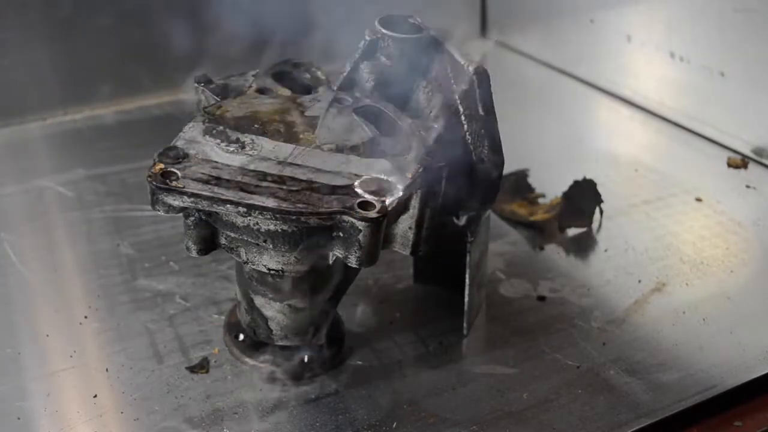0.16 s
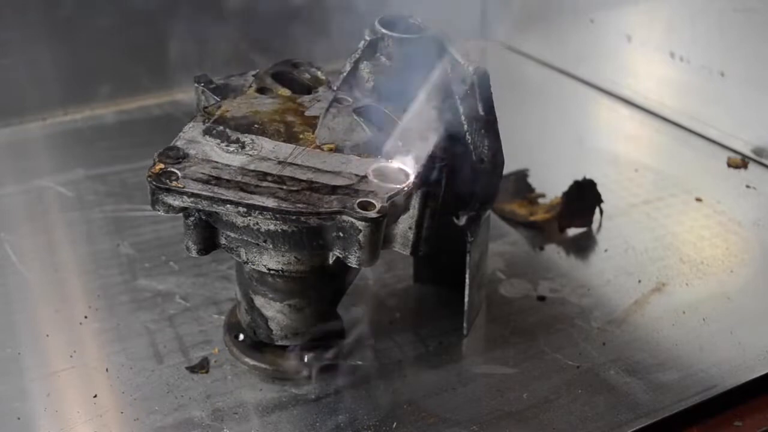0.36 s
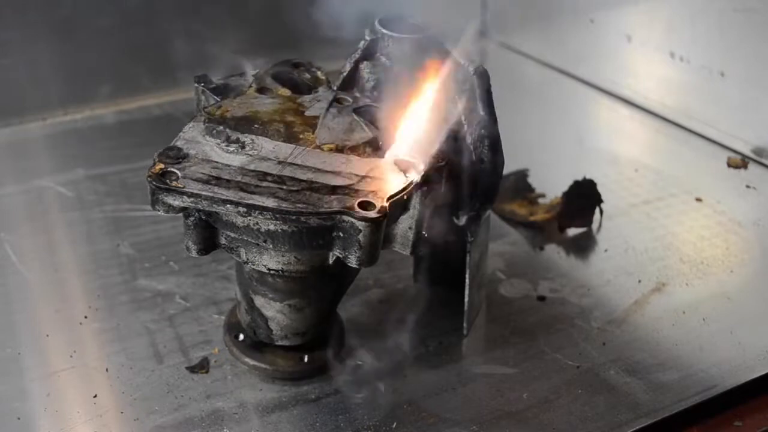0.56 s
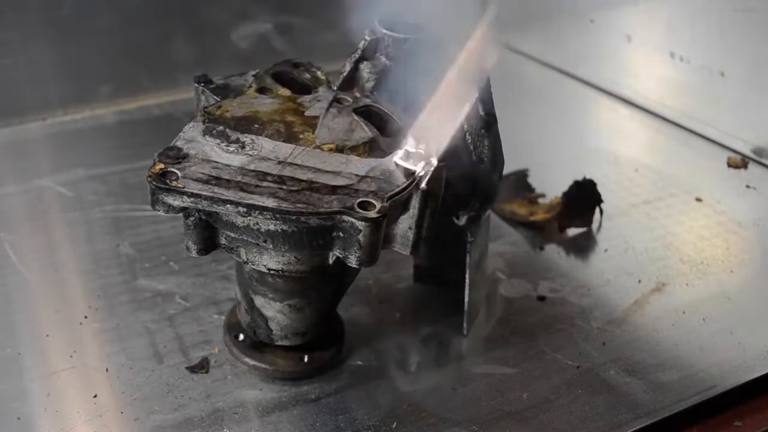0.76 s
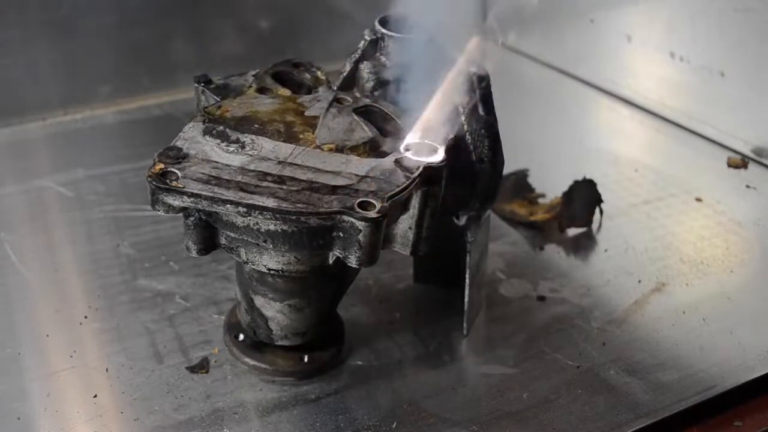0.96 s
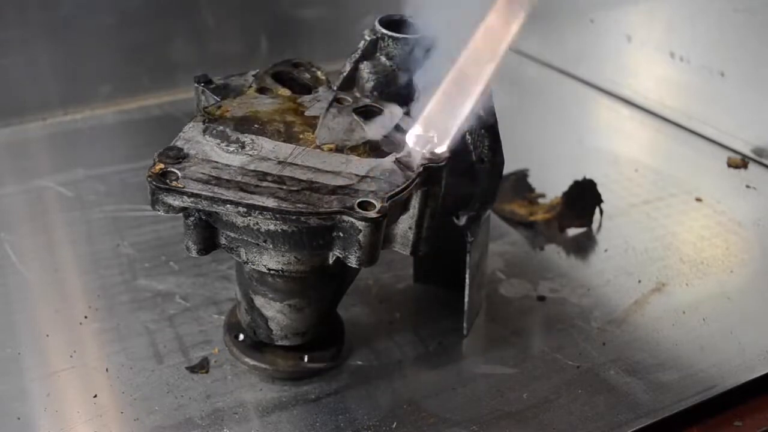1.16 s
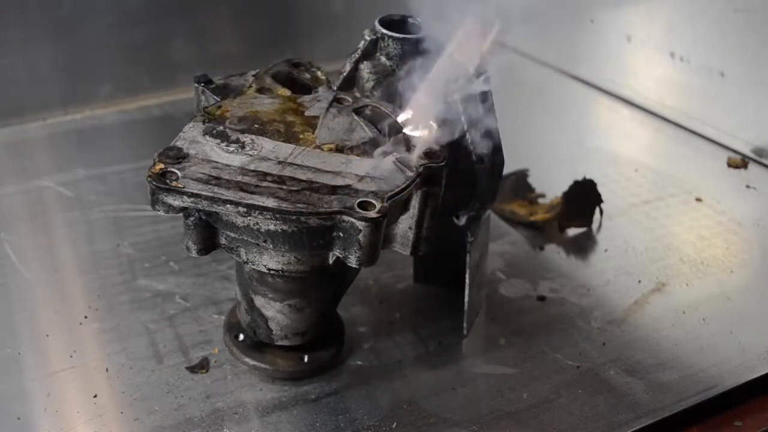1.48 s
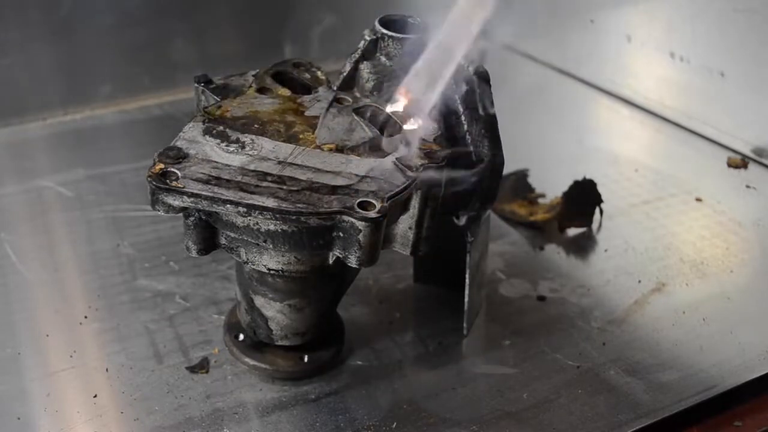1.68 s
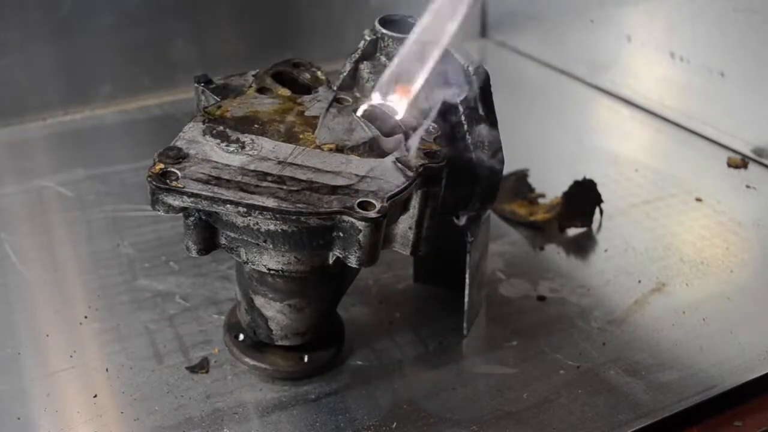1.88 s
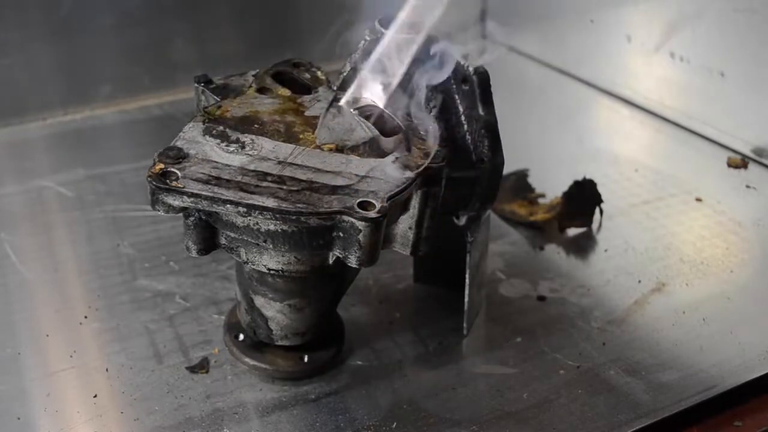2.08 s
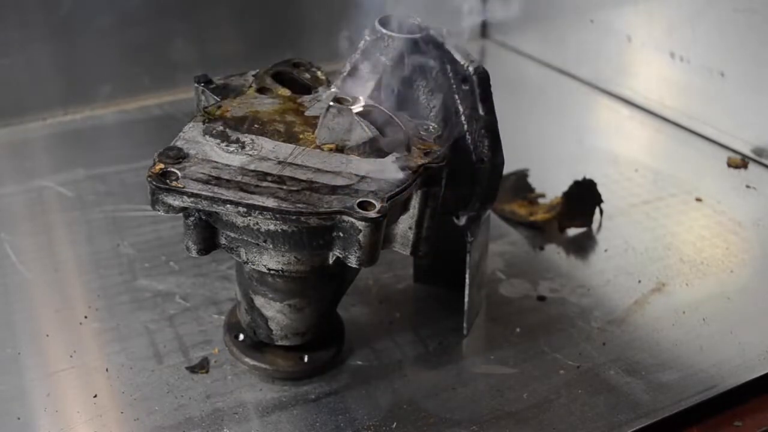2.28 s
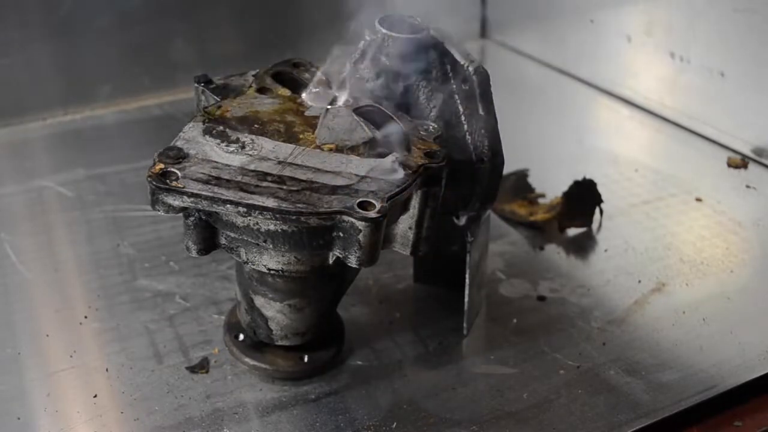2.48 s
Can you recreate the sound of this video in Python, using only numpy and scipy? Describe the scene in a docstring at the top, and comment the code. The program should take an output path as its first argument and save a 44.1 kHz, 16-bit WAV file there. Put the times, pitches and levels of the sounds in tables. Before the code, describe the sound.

A laser cleaning a grimy metal casting makes a thin, very high whine with treble fizz, quiet at first. Around 0.4-0.75 s it swells into a harsh low buzz with a few sharp snaps. It thins to whine and light buzzing, turns raspier from 1.6 s, then buzzes and crackles rapidly at 1.9-2.25 s. Tiny pings and a brief falling squeal follow as it fades, close and dry.

```python
"""In a steel cabinet, a pulsed laser cleans a greasy metal casting; its spot races round a small ring led slowly over the part.
The shot rate is a thin whine, a sine with side tones; laps over thick grime buzz and sharp stain edges rasp.
Edges chop the shot tone into treble fizz; uneven dirt yield adds noise, a grainy hiss and soft roar.
Flakes snap off, chips ping as decaying sines, and a side band sweeps down late on.
Short wall reflections surround the work; filtered-noise air and a mains hum lie faintly behind."""
import sys
import numpy as np
from scipy import signal
from scipy.fft import rfft, irfft, next_fast_len
from scipy.io import wavfile
from scipy.ndimage import uniform_filter1d, map_coordinates

SR = 44100
rng = np.random.default_rng(int(sys.argv[2]) if len(sys.argv) > 2 else 0)


def materialize(psi):
    """Save the field psi as 16-bit PCM at rate SR to the path in sys.argv[1].

    A 1-D psi becomes a single channel; in a 2-D psi each row is a channel.
    """
    bounded = np.clip(np.atleast_2d(psi).T, -1, 1)
    quanta = np.round(bounded * 32767).astype(np.int16)
    wavfile.write(sys.argv[1], SR, quanta)


N = 116865
T = np.arange(N) / SR   # s

# position of the thickest grime on the ring: t/s, angle/turns
GRIME_POSITION = [(0, 0.3), (.33, 0.44), (.5, 0.59), (1.0, 0.7), (1.55, 1), (2.2, 0.79), (2.65, 1)]

# register levels before trim and flutter: t/s, level/dB
HUM_LEVEL = [(0.0, -62.5), (0.06, -74), (0.15, -59.5), (0.19, -74), (0.34, -65), (0.43, -42.5),
             (0.52, -41.5), (0.6, -47), (0.64, -41.5), (0.8, -70), (0.83, -56), (0.94, -71.5), (1.01, -58),
             (1.12, -65.5), (1.17, -58), (1.34, -56.5), (1.41, -60.5), (1.83, -58.5), (1.96, -44.5),
             (2.21, -47), (2.36, -69), (2.65, -79)]   # deep hum at the lap rate
BUZZ_LEVEL = [(0, -64), (.08, -77.5), (.14, -58), (.19, -72), (.33, -64.5), (.43, -37.5), (.52, -37),
              (.6, -46), (.64, -36), (.72, -44.5), (.78, -64), (.96, -53), (1.15, -52.5), (1.22, -59.5),
              (1.41, -67), (1.445, -51), (1.48, -67.5), (1.65, -44.5), (1.89, -59.5), (1.97, -46.5),
              (2.19, -44), (2.21, -59), (2.31, -52.5), (2.35, -64.5), (2.65, -77)]   # low buzz
NASAL_LEVEL = [(0, -66), (.06, -76), (.14, -54.5), (.2, -69.5), (.45, -46.5), (.6, -50.5), (.69, -41.5),
               (.79, -60.5), (.97, -48.5), (1.52, -62), (1.73, -48.5), (1.81, -58), (1.93, -48.5),
               (1.99, -61.5), (2.19, -43), (2.24, -62.5), (2.65, -73.5)]   # nasal middle of the buzz
RASP_LEVEL = [(0, -57), (.06, -62.5), (.14, -51.5), (.18, -62), (.34, -64), (.46, -46.5), (.51, -41.5),
              (.56, -67.5), (.69, -45.5), (.9, -61.5), (.98, -57), (1.22, -65), (1.29, -48.5), (1.41, -61),
              (1.56, -50), (1.84, -52), (1.9, -41), (2.08, -57), (2.18, -49.5), (2.65, -67.5)]   # rasp
BITE_LEVEL = [(0, -56.5), (.07, -68), (.15, -52), (.2, -67), (.34, -65.5), (.48, -50), (.56, -65),
              (.72, -58), (.93, -64), (1.48, -62.5), (1.64, -44.5), (2.04, -57.5), (2.29, -52), (2.35, -64),
              (2.52, -56.5), (2.65, -80)]   # bright top of the rasp
FIZZ_LEVEL = [(0.0, -50.5), (0.05, -61), (0.14, -44.5), (0.21, -59), (0.26, -55), (0.28, -58), (0.43, -48),
              (0.55, -52), (0.67, -44.5), (0.69, -44), (0.92, -55), (1.0, -49), (1.34, -50), (1.39, -57.5),
              (1.64, -46), (1.84, -50), (1.89, -49.5), (1.97, -54), (2.01, -50), (2.07, -48), (2.14, -50),
              (2.22, -44.5), (2.35, -56), (2.42, -51), (2.55, -57.5), (2.65, -61)]   # treble around the whine
# level of the whine before trim: t/s, level/dB
WHINE_LEVEL = [(0, -46.5), (.22, -50.5), (.35, -44.5), (.43, -31), (.6, -33.5), (.64, -30), (.8, -40.5),
               (.91, -44), (.99, -37), (1.42, -41.5), (1.51, -46), (1.62, -37.5), (1.84, -38),
               (1.97, -33.5), (2.19, -34), (2.44, -50.5), (2.51, -47.5), (2.65, -62.5)]

# spectral shape of each layer, relative: f/Hz, gain/dB
HUM_COLOUR = [(90, -28), (205, 0), (290, -9), (410, -40)]
BUZZ_COLOUR = [(205, -40), (330, -5), (410, 0), (616, -5), (822, -35), (1500, -60)]
NASAL_COLOUR = [(480, -60), (800, 0), (1050, 0), (1450, -60)]
RASP_COLOUR = [(900, -55), (1200, 2), (1440, 0), (1645, -1.5), (1850, -1.5), (2200, -55)]
BITE_COLOUR = [(1700, -50), (2055, 7), (2400, 3), (2850, 0.5), (3300, -45), (5000, -41)]
EDGE_COLOUR = [(2200, -41), (3050, 3), (3450, 1.5), (4300, -5), (5500, -8), (7000, -18.5), (9000, -54)]
FIZZ_COLOUR = [(4000, -32), (5500, -18), (6800, -12), (7600, -5), (8600, -1), (9150, 0), (9600, -12),
               (10500, -12), (11050, 3), (12000, -1), (13200, -6), (14500, -12), (16000, -15)]
SIZZLE_COLOUR = [(40, -17), (300, -5.5), (1200, 0.5), (2500, -4), (4500, -12.5), (6800, -12), (9000, -10.5),
                 (10300, 2.5), (12000, -9), (15500, -34)]
ROAR_COLOUR = [(30, -32), (150, -9), (400, -2), (1100, 0), (2500, -6), (4500, -17), (9000, -25)]
AIR_COLOUR = [(25, -76), (100, -8), (300, 7), (600, -17), (1050, 18.5), (2500, 8.5), (5000, -2.5),
              (10000, 2), (16000, -20)]

# whine band, and a gap where two patches of grime cancel: t/s, centre/Hz, half width/Hz, gap/Hz
WHINE_BAND = [(0, 9520, 810, 9350), (.3, 10020, 470, 10460), (.55, 9940, 490, 10200),
              (.72, 10230, 490, 10300), (.87, 9840, 463, 9670), (1.12, 10210, 404, 9840),
              (1.3, 10000, 646, 9400), (1.52, 10200, 750, 9750), (1.65, 9960, 687, 10060),
              (1.82, 10050, 650, 10000), (1.94, 9920, 450, 8750), (2.04, 10080, 476, 10200),
              (2.15, 10130, 635, 9660), (2.3, 9800, 550, 9900), (2.65, 10140, 600, 10150)]
# overtones of the buzz that swell and fade: middle t/s, half length/s, multiple of the lap rate
OVERTONE_SWELLS = [(0.782, 0.16, 7), (1.014, .2, 2), (1.096, 0.14, 5), (1.27, 0.11, 9), (1.612, 0.22, 9),
                   (1.707, 0.065, 4), (1.91, 0.022, 7), (2.275, 0.032, 14)]
# flakes cracking off, level before trim: t/s, level/dB
FLAKE_EVENTS = [(.3245, -37), (.3661, -33), (.4155, -28), (.528, -36), (.576, -39), (.592, -36),
                (1.906, -34), (1.9553, -32), (1.9695, -32), (2.0187, -33), (2.0672, -30), (2.0825, -30),
                (2.1307, -27), (2.1795, -26), (2.243, -37)]
# small chips pinging off the metal, initial amplitude: t/s, level/dB
PING_EVENTS = [(2.242, -39.5), (2.2908, -41), (2.3545, -48)]
# side band falling as the spot slides off an edge: t/s, f/Hz, level/dB
SIDE_BAND_SWEEP = [(2.25, 9350, -70), (2.28, 8800, -44), (2.305, 8050, -47.5), (2.33, 7060, -69)]

SHOT_HZ, LAP_HZ = 9998.2, 205.5
RING_RADIUS_MM, TRAVEL_MM_PER_S = 8, 22
STAIN_SCALE_MM, EDGE_SHARPNESS = 17, 7.5
GRIME_WIDTH_TURNS, FAR_SIDE_WIDTH_TURNS = 0.045, 0.035
FAR_SIDE_SHARE, BARE_SHARE, STAIN_SHARE = 0.59, 0.01, 0.23   # re grime yield
DOPPLER_RAD, DOPPLER_WANDER_RAD = 1.387, 0.1
MIC_TURNS = 0.89   # microphone direction on the ring
ECHO_S, ECHO_WANDER_S, ECHO_GAIN = 0.0007, 0.000061, 0.083   # first reflection off the part

# level trims
HUM_DB, BUZZ_DB, NASAL_DB, RASP_DB, BITE_DB, EDGE_DB = -1.5, 0, -.4, 0, -.6, -14.5
WHINE_DB, FIZZ_DB, SIZZLE_DB, ROAR_DB, FLAKE_DB = -1, 1.5, -10, -15, 1.5
AIR_DB, CABINET_DB = -67.5, -14
SWELL_DB = 8
GAP_WIDTH_HZ, GAP_DB = 110, -11
FLAKE_DECAY_S, FLAKE_HIGHPASS_HZ = .0008, 1600
PING_HZ, PING_DECAY_S = 4600, 0.00098
CABINET_T60_S = .075
MAINS_HZ, MAINS_DB = 100, -85
CUTOFF_HZ = 15850


def from_db(db):
    """Decibels to gain."""
    return 10 ** (np.asarray(db) / 20)


def in_time(rows):
    """Interpolate a two-column curve at every sample."""
    return np.interp(T, *np.transpose(rows))


def even(x):
    """Hold the rms over four laps near 1."""
    power = uniform_filter1d(x * x, size=int(4 * SR / LAP_HZ))
    return x / np.sqrt(power + 1e-14)


def colour(x, points):
    """Filter by a gain curve, linear in dB over log frequency."""
    hz, db = np.transpose(points)
    size = next_fast_len(N + 4096)
    f_hz = np.maximum(np.arange(size // 2 + 1) * SR / size, 1)
    gain = from_db(np.interp(np.log(f_hz), np.log(hz), db))
    return irfft(rfft(x, size) * gain, size)[:N]


def drift(rate_hz):
    """Smooth random curve of spread about 1, changing about rate_hz times a second."""
    return map_coordinates(rng.standard_normal(2048), [T * rate_hz + 2], order=2, mode="wrap")


def lobe(turns, width_turns):
    """A bell-shaped bump once a lap."""
    offset = (turns + .5) % 1 - .5
    return np.exp(-.5 * (offset / width_turns) ** 2)


def stains(count=14):
    """Dirt (0-1) under the circling spot: random plane waves clipped into sharp-edged stains."""
    spot_mm = RING_RADIUS_MM * np.exp(2j * np.pi * LAP_HZ * T) + TRAVEL_MM_PER_S * T
    field = np.zeros(N)
    for way, fine, start in rng.random((count, 3)):
        along_mm = (spot_mm * np.exp(2j * np.pi * way)).real
        field += np.cos(2 * np.pi * (along_mm * (.5 + fine) / STAIN_SCALE_MM + start))
    return .5 + .5 * np.tanh(EDGE_SHARPNESS * field / np.sqrt(count / 2))


def partials(x, pitches_hz, evenness, size=1290):
    """Split a once-a-lap sound into lines and pull their strengths towards one another."""
    window = np.hanning(size)
    for hz in pitches_hz:
        kernel = window * np.exp(2j * np.pi * hz * T[:size])
        centring = np.exp(-1j * np.pi * hz * (size - 1) / SR)
        line = signal.oaconvolve(x, kernel, "same") * centring
        yield line.real / (np.abs(line) + 1e-9) ** np.clip(evenness, 0, 1)


def swell(k):
    """Gain of the k-th overtone, raised by its flat-topped swells."""
    return from_db(sum(SWELL_DB * np.exp(-((T - s) / half_s) ** 4)
                       for s, half_s, multiple in OVERTONE_SWELLS if multiple == k))


def overtones(flow, multiples, evenness):
    """Clean lines at multiples of the lap rate, each with its swells."""
    lines = partials(flow, LAP_HZ * multiples, evenness, size=2150)
    return sum(swell(k) * line for k, line in zip(multiples, lines))


def voiced(flow, level_db, points, rough, flutter_db=2.5):
    """One register of the vapour flow: coloured, rough in strength and fluttering in level."""
    rough_flow = flow * (1 + rough * drift(500))
    level = from_db(level_db + flutter_db * drift(39.73))
    return level * even(colour(rough_flow, points))


def buzz(passes, edges, low_edge_share=0.55, high_edge_share=1.0, count=36):
    """Lap puffs off the grime give the low registers; flow jumps at stain edges the rasp and its top."""
    multiples = np.arange(1, count)
    puffs = overtones(passes + low_edge_share * edges, multiples[:5], evenness=.9)
    jumps = overtones(passes + high_edge_share * edges, multiples[5:], evenness=.45)
    return (voiced(puffs, HUM_DB + in_time(HUM_LEVEL), HUM_COLOUR, rough=0.13)
            + voiced(puffs, BUZZ_DB + in_time(BUZZ_LEVEL), BUZZ_COLOUR, rough=0.056)
            + voiced(puffs, NASAL_DB + in_time(NASAL_LEVEL), NASAL_COLOUR, rough=0.11)
            + voiced(jumps, RASP_DB + in_time(RASP_LEVEL), RASP_COLOUR, rough=0.07)
            + voiced(jumps, BITE_DB + in_time(BITE_LEVEL), BITE_COLOUR, rough=0.092)
            + voiced(jumps, EDGE_DB + in_time(FIZZ_LEVEL), EDGE_COLOUR, rough=0.083))


def band(hz, centre_hz, width_hz):
    """Gain of a resonance with steep skirts."""
    return 1 / (1 + ((hz - centre_hz) / width_hz) ** 4)


def whine(shots, burn, rough=0.071, count=6):
    """The shot rate with side tones a lap rate apart, in a band that shifts and widens with the grime."""
    at_s, *curves = np.transpose(WHINE_BAND)
    centre_hz, width_hz, gap_hz = (np.interp(T, at_s, curve) for curve in curves)
    pitches_hz = SHOT_HZ + LAP_HZ * np.arange(-count, count + 1)
    tone = np.zeros(N)
    for hz, line in zip(pitches_hz, partials(shots * burn, pitches_hz, evenness=0.84)):
        gap = from_db(GAP_DB * np.exp(-((hz - gap_hz) / GAP_WIDTH_HZ) ** 2))
        tone += line * band(hz, centre_hz, width_hz) * gap
    return from_db(WHINE_DB + in_time(WHINE_LEVEL)) * even(tone * (1 + rough * drift(500)))


def glance(x):
    """Add a reflection off the part; its changing path makes the emphasis wander."""
    delay_s = ECHO_S + ECHO_WANDER_S * drift(11)
    return x + ECHO_GAIN * np.interp(T - delay_s, T, x)


def fizz(shots, passes, edges, grime_share=0.43, rough=0.11):
    """Stain edges and grime passes chop the shot tone into a wide comb of side tones."""
    chopped = shots * glance(edges + grime_share * passes)
    return voiced(chopped, FIZZ_DB + in_time(FIZZ_LEVEL), FIZZ_COLOUR, rough)


def sizzle(burn, grain_db=-0.5, hum_share=0.033):
    """Uneven yield from shot to shot as noise: a grainy hiss, and a soft roar where thick grime burns."""
    grains = rng.standard_normal(N) * burn * from_db(grain_db * drift(900))
    hum_level_db = in_time(HUM_LEVEL)
    hiss_level_db = hum_share * hum_level_db + (1 - hum_share) * in_time(FIZZ_LEVEL)
    hiss = from_db(SIZZLE_DB + hiss_level_db) * even(colour(grains, SIZZLE_COLOUR))
    roar = from_db(ROAR_DB + hum_level_db) * even(colour(grains, ROAR_COLOUR))
    return hiss + roar


def background():
    """Faint extraction air as coloured noise, and mains hum as a sine."""
    air = from_db(AIR_DB) * even(colour(rng.standard_normal(N), AIR_COLOUR))
    mains = from_db(MAINS_DB) * np.sqrt(2) * np.sin(2 * np.pi * MAINS_HZ * T)
    return air + mains


def cabinet(x):
    """Dense short reflections from the steel walls: decaying noise of unit energy."""
    t = T[:SR // 4]
    tail = rng.standard_normal(len(t)) * from_db(-60 * t / CABINET_T60_S) * (t > .002)
    return signal.fftconvolve(x, tail / np.sqrt(np.sum(tail ** 2)))[:N]


def flakes(snap=1.92, debris=0.29):
    """Each flake is a one-sample snap and a short decaying noise spray of debris, high-passed."""
    out, spray = np.zeros(N), rng.standard_normal(N)
    for s, db in FLAKE_EVENTS:
        i = int(s * SR)
        crack = debris * spray[i:] * np.exp(-T[:N - i] / FLAKE_DECAY_S)
        crack[0] = snap
        out[i:] += from_db(db + FLAKE_DB) * crack
    highpass = signal.butter(1, FLAKE_HIGHPASS_HZ, "high", fs=SR, output="sos")
    return signal.sosfilt(highpass, out + 1e-18)


def pings():
    """Each chip rings for a few milliseconds as a decaying sine."""
    out = np.zeros(N)
    for s, db in PING_EVENTS:
        t = T[:N - int(s * SR)]
        out[-len(t):] += from_db(db) * np.sin(2 * np.pi * PING_HZ * t) * np.exp(-t / PING_DECAY_S)
    return out


def sweep(turns, width_hz=520, count=17):
    """A narrow group of the shot tone and its lower side tones, falling in pitch."""
    s, centre_hz, db = np.transpose(SIDE_BAND_SWEEP)
    on = (T > s[0]) & (T < s[-1])
    t, out = T[on], np.zeros(N)
    centre_now_hz = np.interp(t, s, centre_hz)
    tone = np.zeros(len(t))
    for k in range(count):
        gain = band(SHOT_HZ - k * LAP_HZ, centre_now_hz, width_hz)
        tone += gain * np.cos(2 * np.pi * (SHOT_HZ * t - k * turns[on]))
    out[on] = from_db(np.interp(t, s, db)) * tone / tone.std()
    return out


def scene():
    """The spot circles over grime and stains; its distance swings once a lap and bends the shot tone."""
    turns = LAP_HZ * T - in_time(GRIME_POSITION)
    dirt = stains()
    edges = even(np.gradient(dirt))
    passes = even(lobe(turns, width_turns=.007))
    burn = (BARE_SHARE + STAIN_SHARE * dirt + lobe(turns, GRIME_WIDTH_TURNS)
            + FAR_SIDE_SHARE * lobe(turns + .5, FAR_SIDE_WIDTH_TURNS))
    swing_rad = DOPPLER_RAD + DOPPLER_WANDER_RAD * drift(4.48)
    swing = swing_rad * np.sin(2 * np.pi * (LAP_HZ * T + MIC_TURNS))
    shots = np.sin(2 * np.pi * SHOT_HZ * T + swing)
    work = buzz(passes, edges) + whine(shots, burn) + fizz(shots, passes, edges) + sizzle(burn)
    work += flakes() + pings() + sweep(turns)
    return (work + from_db(CABINET_DB) * cabinet(work) + background())[None]


def record(dry):
    """Cut the top steeply with an elliptic low-pass."""
    lowpass = signal.ellip(12, .1, 90, CUTOFF_HZ, fs=SR, output="sos")
    return signal.sosfilt(lowpass, dry)


dry = scene()
out = record(dry)
materialize(out)
```